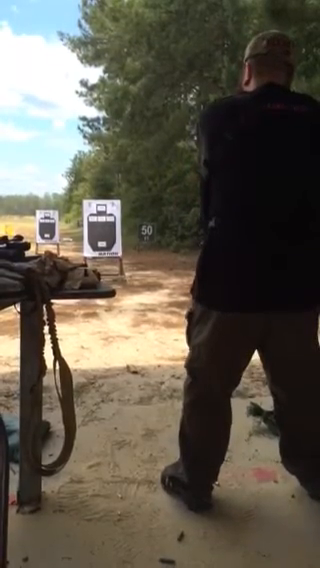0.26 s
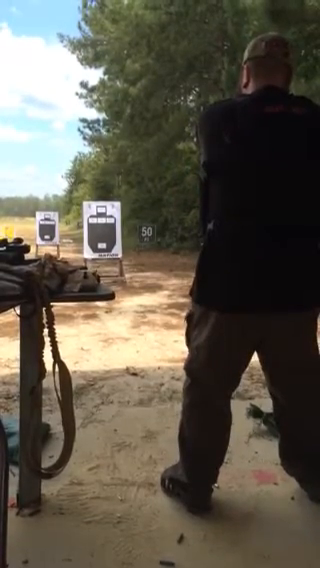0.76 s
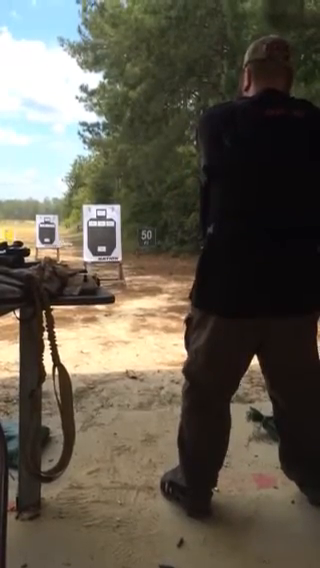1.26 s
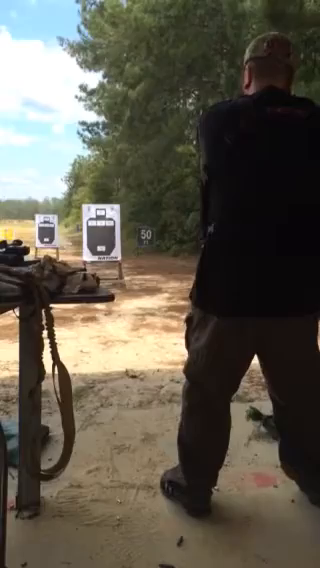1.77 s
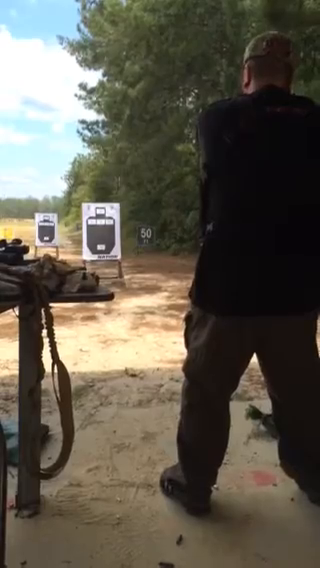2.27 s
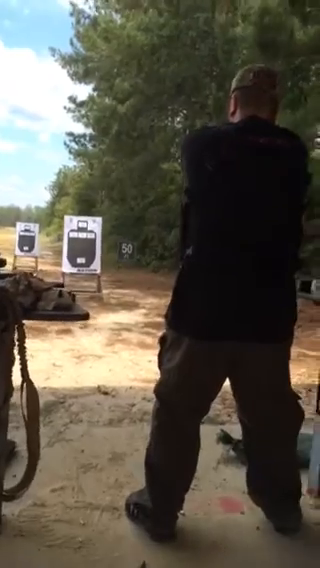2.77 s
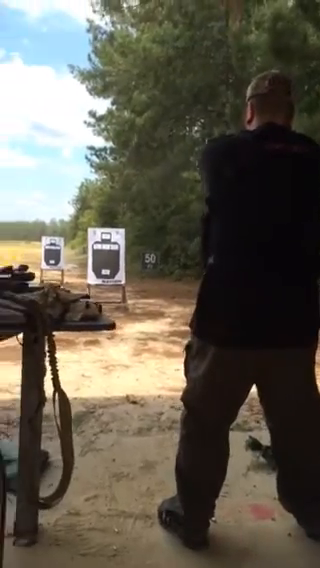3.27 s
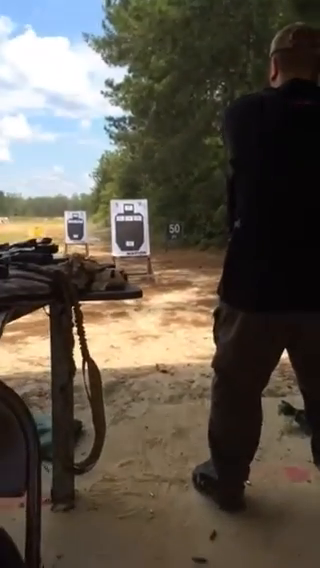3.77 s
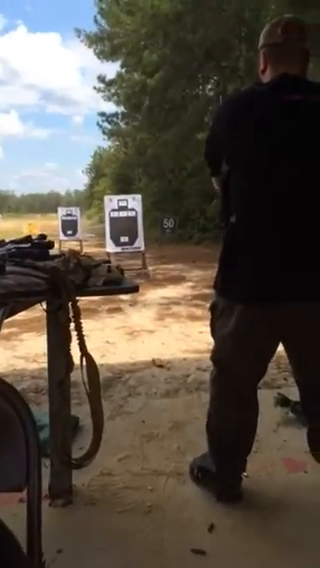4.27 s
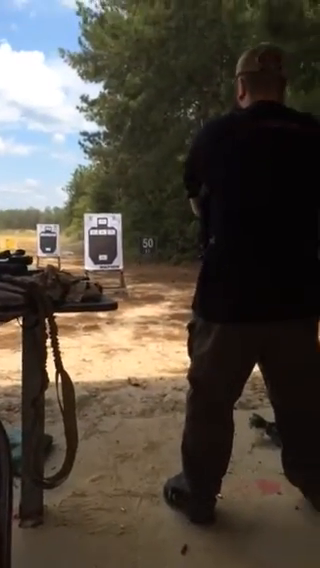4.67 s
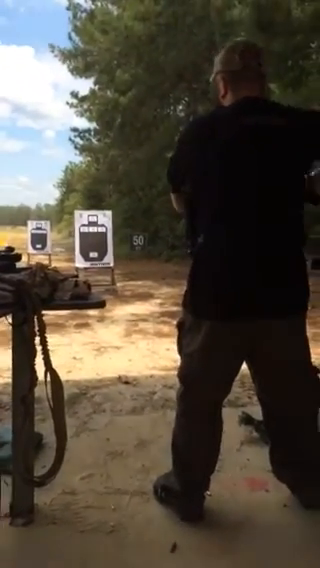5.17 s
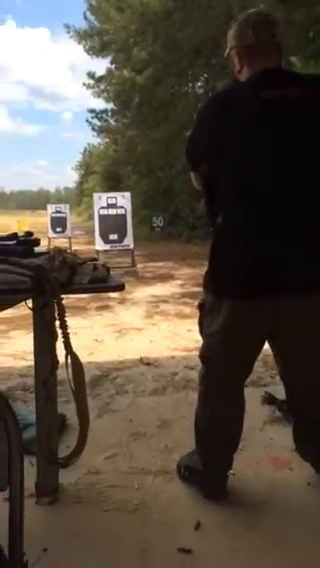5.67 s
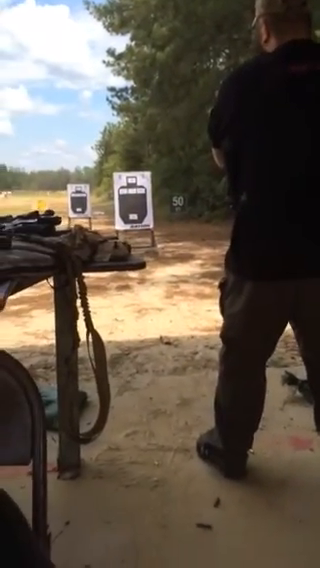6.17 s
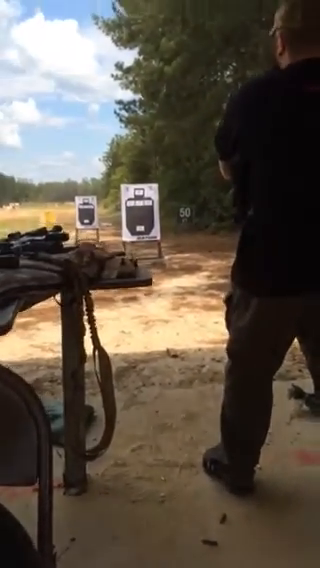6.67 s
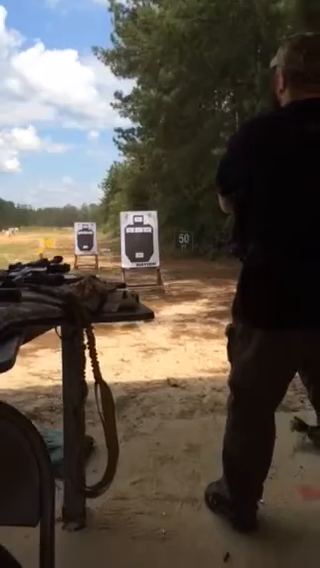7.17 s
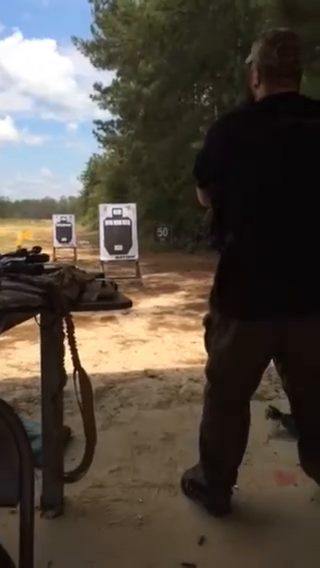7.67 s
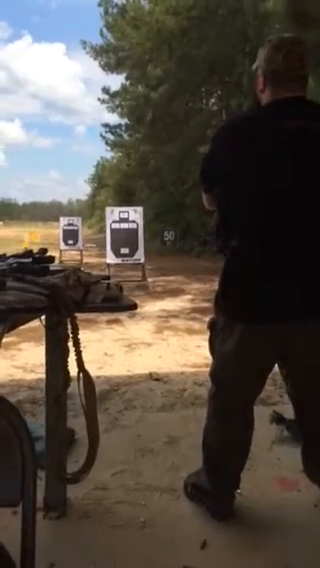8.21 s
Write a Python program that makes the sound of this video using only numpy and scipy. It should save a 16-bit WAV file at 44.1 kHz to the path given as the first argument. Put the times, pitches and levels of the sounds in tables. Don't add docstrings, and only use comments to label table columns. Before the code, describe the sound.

Quiet scuffs and a low far engine come first, then a sharp overloaded gunshot with a dense roof roar and a long woodland echo. A brass case clinks on concrete before a second similar shot. As its echo fades, metallic gun handling, dull thuds, shoe scrapes and fabric rubs follow close by, with soft wind rumble on the phone microphone.

```python
import sys
import numpy as np
from scipy import signal
from scipy.fft import rfft, irfft
from scipy.io import wavfile
from scipy.ndimage import uniform_filter1d, map_coordinates

SR = 44100
rng = np.random.default_rng(int(sys.argv[2]) if len(sys.argv) > 2 else 0)


def to_linear_factor(level_db):
    exponent = np.asarray(level_db, float) / 20
    return 10 ** exponent


def store_wav(level_fs):
    pcm = np.round(np.clip(np.atleast_2d(level_fs), -1, 1) * 32767)
    wavfile.write(sys.argv[1], SR, pcm.T.astype(np.int16))


N = 372204


def unit(x):
    return x / np.sqrt(np.mean(x ** 2) + 1e-20)


def along(points, hz):
    f, v = np.transpose(points)
    return np.interp(np.log(hz + 1), np.log(f + 1), v)


def curves(rows, silent=-120):
    s, *cols = np.transpose(rows)
    return [np.interp(np.arange(N) / SR, s, c, silent, silent) for c in cols]


def wobble(rate, size=N):
    return map_coordinates(rng.standard_normal(4096), [np.arange(size) * rate / SR])


def noise(spectrum, size):
    hz = np.fft.rfftfreq(size, 1 / SR)
    white = rfft(rng.standard_normal(size))
    return unit(irfft(white * to_linear_factor(along(spectrum, hz)), size))


def patchy(x, depth_db):
    z = signal.stft(x, nperseg=512)[2]
    field = uniform_filter1d(rng.standard_normal(z.shape), size=5, axis=0)
    field = uniform_filter1d(field, size=7, axis=1)
    return unit(signal.istft(z * to_linear_factor(depth_db * unit(field)), nperseg=512)[1][:len(x)])


def resonances(x, modes):
    f = np.fft.rfftfreq(len(x), 1 / SR)
    response = 0
    for k, (centre, width, db) in enumerate(modes):
        peak = 1j * f * width / (centre * centre - f * f + 1j * f * width)
        response = response + (-1) ** k * to_linear_factor(db) * peak
    return irfft(rfft(x) * response, len(x))


def add(track, s, sound):
    part = track[round(s * SR):][:len(sound)]
    part += sound[:len(part)]


# pitch_hz, time_to_fade_60_db_s
SHELTER_FADE = [(60, 0.51), (300, 0.59), (1000, 0.42), (3000, 0.37), (8000, 0.29), (16000, 0.21)]


def shelter_tail(spectrum, size, shorter=1):
    hz, t, z = signal.stft(noise(spectrum, size=size), SR, nperseg=256)
    fade_s = shorter * along(SHELTER_FADE, hz)[:, None]
    return signal.istft(z * to_linear_factor(-60 * t / fade_s), SR, nperseg=256)[1]


# time_s, level_db
WIND_GUSTS = [(3.6, -52.5), (4.14, -52), (4.23, -64), (4.31, -49), (4.46, -55.5), (5.45, -57), (5.47, -73),
              (5.51, -50), (5.62, -61.5), (6.2, -57), (6.5, -73), (7.35, -60), (7.37, -76), (7.51, -67),
              (8.22, -60), (8.26, -75), (8.3, -55), (8.44, -74)]
# pitch_hz, level_db (per Hz)
WIND_COLOUR = [(12, -38), (20, -17), (60, 5), (166, 0.5), (275, -12.5), (400, -13), (520, -43.5),
               (880, -120)]
# pitch_hz, level_db (per Hz)
AIR_COLOUR = [(110, -24), (200, -3.5), (227, -14.5), (482, -18.5), (749, -20), (933, -22.5), (14900, -43.5),
              (16000, -41.5)]


def wind_and_air():
    now = np.arange(N) / SR
    shove = 0
    for s, *_, db in SHOTS:
        shove = shove + to_linear_factor(db - 2.5) * np.exp(-((now - s - 0.07) / 0.038) ** 2)
    gusts = to_linear_factor(curves(WIND_GUSTS, -58)[0] - 0.4 + 3.7 * wobble(24))
    rumble = (gusts + shove) * noise(WIND_COLOUR, size=N)
    air = to_linear_factor(-63.5 + 0.88 * wobble(9.9)) * noise(AIR_COLOUR, size=N)
    return rumble + air


# start_s, peak_db, rise_s, length_s
BOOT_SCUFFS = (7.4, -9.5), [(.025, -34, 0.013, 0.12), (.538, -32, .002, .022), (.699, -29, 0.01, 0.048),
               (.796, -36, .003, 0.028), (.83, -38.5, .003, 0.036), (1.916, -33.5, .009, 0.042),
               (3.826, -34, .009, 0.065), (5.482, -35.5, .011, .063), (6.856, -32, 0.0045, 0.052)]
HEEL_SCUFFS = (13, -20.5), [(.513, -39.5, .01, 0.027), (4.784, -31.5, .004, 0.051),
               (5.66, -39.5, .004, 0.03)]
SLEEVE_SCUFFS = (-13, -2.5), [(.183, -42, .015, .037), (4.298, -23, .003, .032), (4.883, -47.5, .046, .13),
                 (5.054, -40.5, 0.039, .12)]
POUCH_SCUFFS = (-5, -14.5), [(5.118, -35, 0.0076, 0.041), (5.849, -40.5, .007, 0.076),
                (6.262, -26, 0.0043, .041), (6.591, -33.5, 0.021, .076), (6.969, -29.5, 0.01, 0.07),
                (7.305, -38, 0.0034, .086)]
HOLSTER_SCUFFS = (-6, -32), [(4.482, -30, .003, 0.022), (6.034, -35.5, 0.05, 0.11),
                  (6.204, -49, .0037, .046)]
STRAP_SCUFFS = (-17, -19), [(7.459, -47.5, 0.033, 0.045), (7.642, -27, .0035, .077),
                (7.96, -29.5, 0.0077, .1)]
# pitch_hz, width_hz, level_db
RUBBED_FACE = [(975, 240, -3), (1364, 230, -1), (2002, 190, -2), (2640, 500, -3), (3140, 350, -5.5)]


def scuffs():
    x, t = np.zeros(N), np.arange(16384) / SR
    rubbing = (BOOT_SCUFFS, HEEL_SCUFFS, SLEEVE_SCUFFS, POUCH_SCUFFS, HOLSTER_SCUFFS, STRAP_SCUFFS)
    for (low_db, top_db), strokes in rubbing:
        colour = [(150, low_db - 9), (600, low_db), (1200, -5.5), (2600, -3),
                  (8000, top_db + 5.5), (16000, top_db - 10.5)]
        for s, db, rise, length in strokes:
            stroke = (1 - np.exp(-t / max(rise, .001))) * np.exp(-(t / length) ** 3.2)
            bumps = rng.standard_normal(len(t)) ** 3 * (rng.uniform(size=len(t)) < .03)
            face = []
            for hz, width, lift_db in RUBBED_FACE:
                a, b = rng.standard_normal(2)
                face.append((hz * (1 + 0.064 * a), width, lift_db + 2.2 * b))
            hiss = noise(colour, size=len(t))
            add(x, s, to_linear_factor(db - 19.5) * stroke * (hiss + 0.7 * unit(resonances(bumps, face))))
    return x * to_linear_factor(1.9 * wobble(250))


# start_s, level_db, pitch_ratio
SLIDE_TONES = ((.001, .7), [(1965, -24.5, 0.15), (2330, -23, .08), (2990, -27.5, .082), (3950, -25.5, 0.12),
                (5400, -32, 0.07), (7270, -31.5, 0.145), (8603, -34, .13), (10510, -40, 0.18)],
                [(4.293, 0, 1)])
MAGAZINE_TONES = ((.001, .75), [(1600, -28, 0.091)], [(4.4675, -1, 1), (5.451, -15, 1.01),
                   (5.711, -20, 1.07)])
MAGAZINE_HIGH_TONES = ((.001, 0.55), [(3920, -37, .068), (6140, -32.5, 0.073)], [(4.4675, 0, 1)])
LATCH_TONES = ((0.0016, 0.94), [(1260, -32.5, 0.091), (2530, -33.5, 0.096)], [(4.49, -4, .9),
                (5.452, -8, 1.27), (6.498, 1.5, 1)])
BUCKLE_TONES = ((0.015, 0.56), [(950, -44, .23)], [(.035, 5.5, 0.84), (.089, -2, 0.99), (7.66, 1, 1),
                 (7.65, -3, 1.47), (7.1, -7, 1.4)])
STRAP_TONES = ((.004, .8), [(1950, -44, .2)], [(.54, -12, 0.97), (.71, -8, 1.2), (6.27, -1, 1.1)])
CASE_TONES = ((.025, .18), [(6970, -40.5, 0.18), (13520, -64, .29)], [(4.51, 0, 1)])
CASE_TICK_TONES = ((.001, 1.3), [(4200, -42, 0.11)], [(2.475, 0, 1)])
INSECT_TONES = ((.015, .25), [(15300, -72.5, 1.5)], [(.37, -8, .294), (1.04, -0.5, 1)])


def rings():
    x, t = np.zeros(N), np.arange(SR // 4) / SR
    ending = np.cos(np.pi / 2 * t / t[-1])
    ringing = (SLIDE_TONES, MAGAZINE_TONES, MAGAZINE_HIGH_TONES, LATCH_TONES, BUCKLE_TONES,
               STRAP_TONES, CASE_TONES, CASE_TICK_TONES, INSECT_TONES)
    for (rise, rough), modes, blows in ringing:
        for s, blow_db, pitch in blows:
            for hz, db, t60 in modes:
                wander = map_coordinates(rng.standard_normal(128), [t * 300])
                level_db = blow_db + db - 60 * t / t60 + 5.5 * rough * wander[::-1]
                shape = to_linear_factor(level_db) * (1 - np.exp(-t / rise)) * ending
                add(x, s, shape * np.sin(2 * np.pi * pitch * hz * t + rough * wander))
    return x


# time_s, level_db
ENGINE_LEVEL = [(0, -51.5), (.5, -52), (1.2, -49), (1.6, -62), (3, -66), (5.2, -66), (6.2, -73),
                (8.44, -67)]
# pitch_hz, width_hz, level_db
EXHAUST = [(55, 25, -11), (90, 23, 1.5), (166.7, 65, -6.5), (757, 9, -8.5)]


def engine():
    chance = rng.standard_normal((144, 2))
    firings_per_s = 17.55
    times = 0.035 + np.arange(len(chance)) / firings_per_s + 0.0013 * chance[:, 0]
    pulses = np.bincount((times * SR).astype(int), to_linear_factor(1.2 * chance[:, 1]), N)
    return to_linear_factor(curves(ENGINE_LEVEL)[0]) * unit(resonances(resonances(pulses, EXHAUST), EXHAUST))


# start_s, peak_db
BRASS_HITS = ((-33, 3.5, -5, 0.05), [(.796, -39), (2.472, -25), (2.637, -33.5), (3.778, -41), (3.91, -26),
               (4.155, -50.5)])
SLIDE_HITS = ((-33, -14, -14, 0.0044), [(.8302, -30), (4.2925, -6), (6.1312, -46.5)])
LATCH_HITS = ((-34, -8.5, -11.5, 0.0051), [(6.4982, -9)])
CATCH_HITS = ((-11, -3.5, -8.5, 0.02), [(.628, -54), (4.282, -50), (4.4675, -25), (4.562, -38), (4.61, -52),
               (4.663, -54), (6.856, -23)])
GRIP_HITS = ((-11, -25, -32.5, 0.0243), [(.369, -61), (4.4907, -17), (4.785, -34), (5.298, -54),
              (5.451, -29), (5.663, -48), (5.688, -45), (5.7112, -34), (5.852, -45), (6.207, -49)])


def clacks():
    x, t = np.zeros(N), np.arange(4096) / SR
    for (low_db, mid_db, top_db, t60), contacts in (BRASS_HITS, SLIDE_HITS, LATCH_HITS, CATCH_HITS, GRIP_HITS):
        colour = [(120, low_db - 17), (600, low_db), (2000, -8.5), (4400, mid_db),
                  (11000, top_db - 2.5), (16000, top_db - 10)]
        for s, db in contacts:
            fade = to_linear_factor(db - 3.5 - 60 * t / max(t60, .002))
            add(x, s, fade * (1 - np.exp(-t / 0.00042)) * noise(colour, size=len(t)))
            answer = shelter_tail(colour, size=SR // 3, shorter=0.54)
            add(x, s + 0.0018, to_linear_factor(db - 20.0) * np.sqrt(t60 / 0.01) * answer)
    return x


# pitch_hz, level_db (per Hz)
SWELL_COLOUR = [(100, -10), (400, 0.5), (1500, -5), (3300, -3.5), (3700, -22.5), (15000, -23)]


def swell_before_blast():
    x, u = np.zeros(N), np.linspace(0, 1, 1024)
    for s, _, db, _ in SHOTS:
        swell = np.sin(2.5 * u) ** .9 * to_linear_factor(5.2 * wobble(300, size=len(u)))
        add(x, s - len(u) / SR, to_linear_factor(db) * swell * noise(SWELL_COLOUR, size=len(u)))
    return x


# start_s, blast_db (before the limiter), swell_db (just ahead), shove_db (on the phone)
SHOTS = [
    (1.2574, 5.5, -36, -27),
    (3.1018, 6, -34.5, -34.5),
]
# pitch_hz, level_db (per Hz)
MUZZLE_COLOUR = [(40, -35), (100, -6.5), (300, -0.5), (800, 1), (2000, -0.5), (5000, -1.5), (10000, -5.5),
                 (16000, -11)]
# pitch_hz, level_db (per Hz)
ROOF_COLOUR = [(150, -29.5), (320, -9.5), (550, -3.5), (850, -1), (1300, -3), (2500, -24), (6000, -51.5)]
# pitch_hz, level_db (per Hz)
SIZZLE_COLOUR = [(1500, -31.5), (5000, 2.5), (12000, -8), (16000, -13)]


def pistol():
    x, t = np.zeros(N), np.arange(SR) / SR
    u = t[:SR // 50] / .0004
    builds = (1 - np.exp(-(t / 0.069) ** 2)) * (0.66 + np.exp(-(t / 0.13) ** 4))
    for s, db, *_ in SHOTS:
        add(x, s, to_linear_factor(db - 3) * (1 - u) * np.exp(-u))
        add(x, s, to_linear_factor(db) * shelter_tail(MUZZLE_COLOUR, size=SR))
        boom = shelter_tail(ROOF_COLOUR, size=SR, shorter=0.97)[:SR]
        add(x, s, to_linear_factor(db - 3 + 2.9 * wobble(60, size=SR)) * builds * boom)
        fade = to_linear_factor(db - 49 - 60 * t / 1.8) * np.cos(np.pi / 2 * t)
        add(x, s, fade * noise(SIZZLE_COLOUR, size=SR))
    return x


# delay_s (after the shot), lift_db (negative is
# softer), width_s
TREE_LINES = [
    (.38, -1.5, 0.022),
    (.67, 3.5, 0.03),
    (.79, 3.5, 0.041),
]
# pitch_hz, level_db (per Hz)
BANK_COLOUR = [(60, -25), (120, -3), (240, 0), (420, -6), (800, -40), (1600, -120)]
# pitch_hz, level_db (per Hz)
WOODS_BOOM_COLOUR = [(35, -30), (60, -20), (194, -2), (500, -5), (880, -4), (3500, -28), (4550, -91),
                     (7700, -120)]
# pitch_hz, level_db (per Hz)
WOODS_HISS_COLOUR = [(700, -40), (880, -17.5), (1500, 2), (2910, -0.5), (5880, -10.5), (14600, -38),
                     (15500, -38), (16000, -56.5)]


def woods():
    x, now = np.zeros(N), np.arange(N) / SR
    for shot, *_ in SHOTS:
        since = now - shot
        late = np.maximum(since - 0.37, 0)
        roll_db = 0.93 * wobble(7) - 6 * np.clip(since - 1.35, 0, .6)
        bank = to_linear_factor(-41.5 - 28 * late + 1.7 * wobble(12)) * noise(BANK_COLOUR, size=N)
        lumps = 0.4 * wobble(30)
        for delay, db, width in TREE_LINES:
            lumps = lumps + db * np.exp(-((since - delay) / width) ** 2)
        boom_db = -35.5 - 12 * late + roll_db + 0.75 * lumps + 0.96 * wobble(45)
        boom = to_linear_factor(boom_db) * patchy(noise(WOODS_BOOM_COLOUR, size=N), depth_db=1.5)
        hiss_db = -45.5 - 14 * late + roll_db + .6 * lumps
        hiss = to_linear_factor(hiss_db) * patchy(noise(WOODS_HISS_COLOUR, size=N), depth_db=1.5)
        x += (bank + boom + hiss) * (now > shot)
    return x


# start_s, level_db,
# pitch_hz, time_to_fade_60_db_s
LOW_BLOWS = [(1.275, -23.5, 55, 0.24), (3.13, -24, 55, 0.17), (4.294, -35, 343, 0.14),
             (4.49, -35.5, 440, 0.096), (4.663, -42, 347, 0.093), (4.785, -35.5, 480, 0.16),
             (4.84, -42, 349, 0.085), (5.451, -42, 220, 0.21), (5.515, -38, 410, 0.096),
             (6.27, -51, 463, 0.16), (6.865, -42.5, 428, 0.17)]


def thuds():
    x, t = np.zeros(N), np.arange(16384) / SR
    for s, db, hz, t60 in LOW_BLOWS:
        body = rng.standard_normal(len(t))
        for _ in range(3):
            body = unit(resonances(body, [(hz, 1.2 * hz, 0)]))
        add(x, s, to_linear_factor(db - 60 * t / t60) * (1 - np.exp(-t / 0.0046)) * body)
    return x


def shelter(near):
    wet, step = np.zeros(N), SR // 6
    for start in range(0, N, step):
        tail = shelter_tail([(300, -5.5), (2000, 1.5), (16000, -1)], size=SR // 3, shorter=0.58)
        echo = signal.fftconvolve(near[start:start + step], tail / np.linalg.norm(tail))
        add(wet, start / SR + .002, echo)
    return wet


def scene():
    near = scuffs() + thuds()
    chime = rings()
    gear = clacks() + near + chime + shelter(to_linear_factor(-3) * near + to_linear_factor(-11.5) * chime)
    return (pistol() + woods() + gear + engine() + wind_and_air())[None]


def low_pass(x):
    return signal.sosfilt(signal.butter(12, 16530, fs=SR, output="sos"), x)


def record(dry):
    power = uniform_filter1d(dry ** 2, size=331, axis=1, origin=-120)
    level = np.sqrt(np.abs(power) + 1e-12)
    gain = (1 + (level / to_linear_factor(-12.5)) ** 2.89) ** (-1 / 2.81)
    x = dry * uniform_filter1d(gain, size=65, axis=1)
    x = x / (1 + np.abs(x / .85) ** 5) ** (1 / 5)
    x = x + swell_before_blast()
    hz = np.fft.rfftfreq(N, 1 / SR)
    x = irfft(rfft(x) * to_linear_factor(along([(15300, 0.5), (15600, -48)], hz)), N)
    return low_pass(x)


dry = scene()
out = record(dry)
store_wav(out)
```